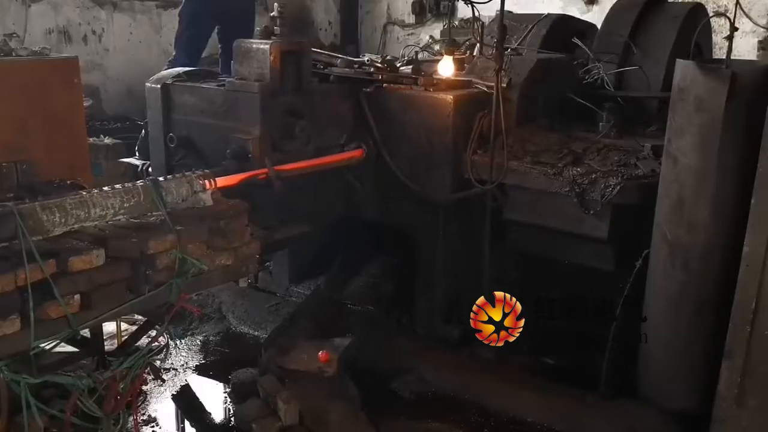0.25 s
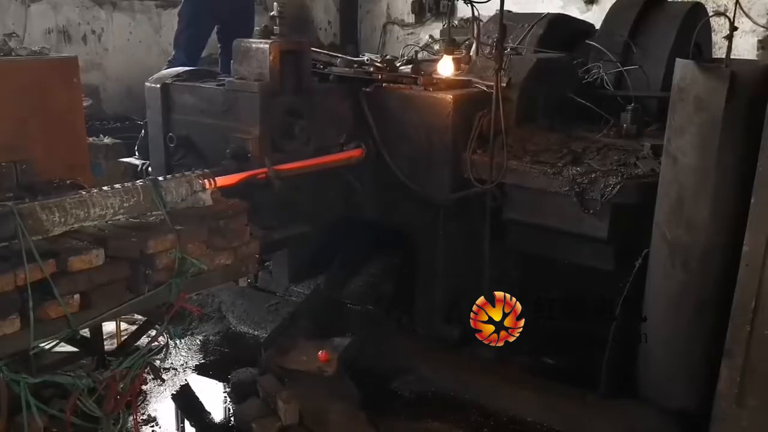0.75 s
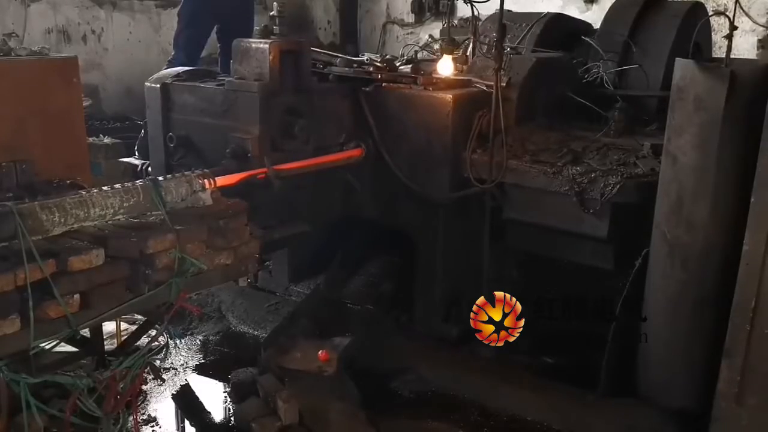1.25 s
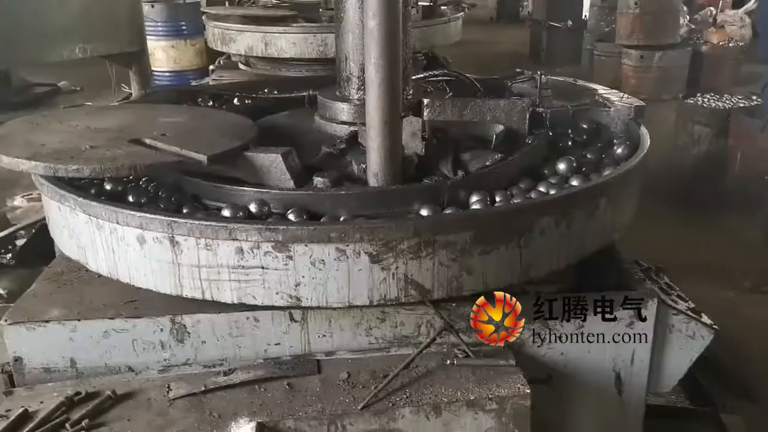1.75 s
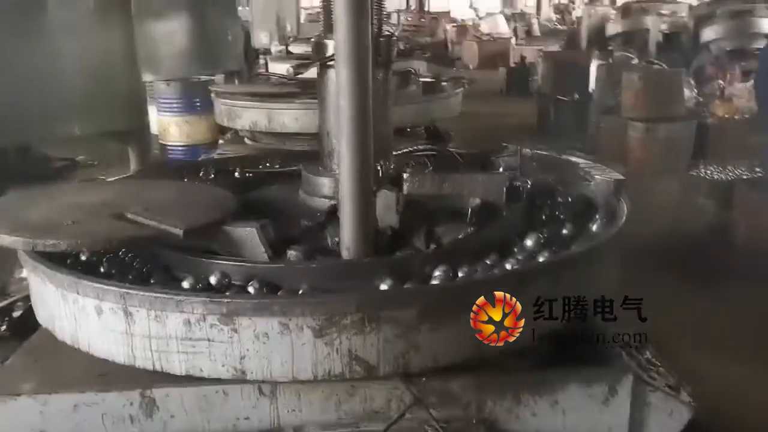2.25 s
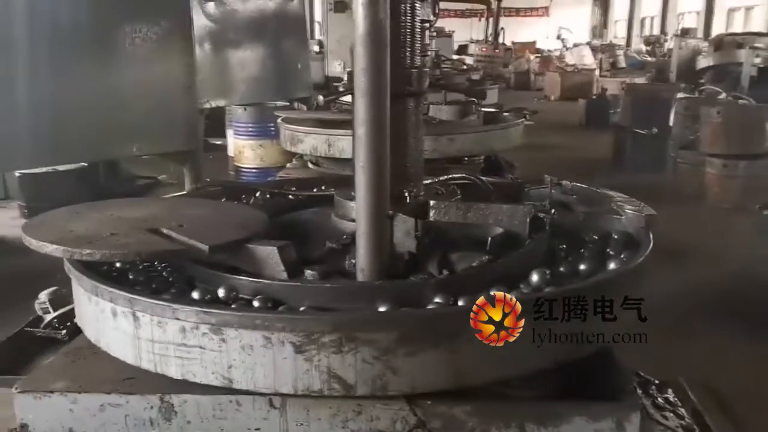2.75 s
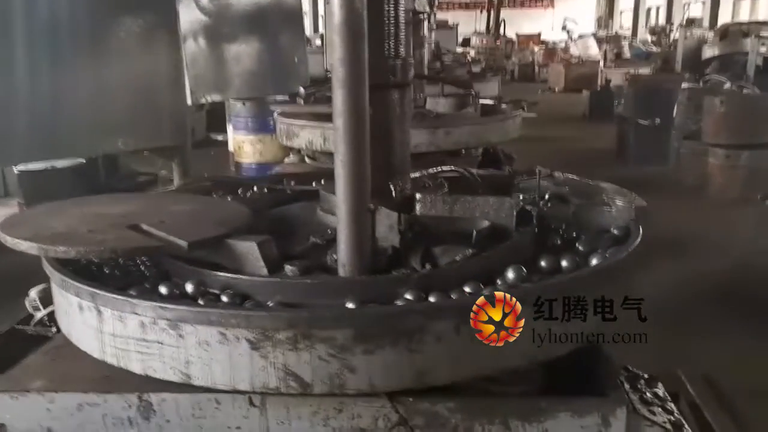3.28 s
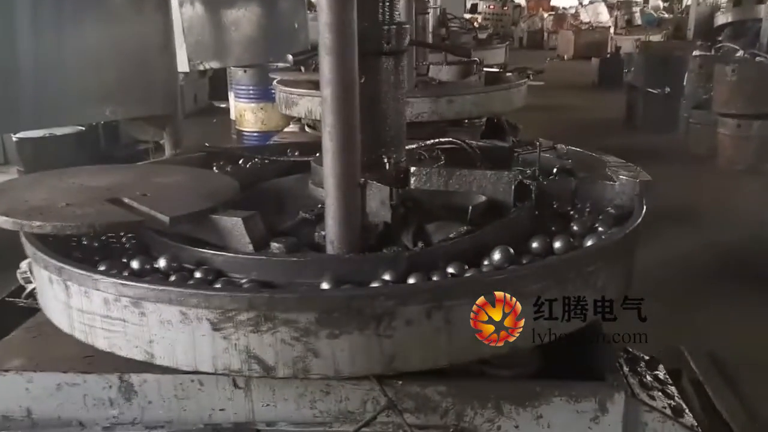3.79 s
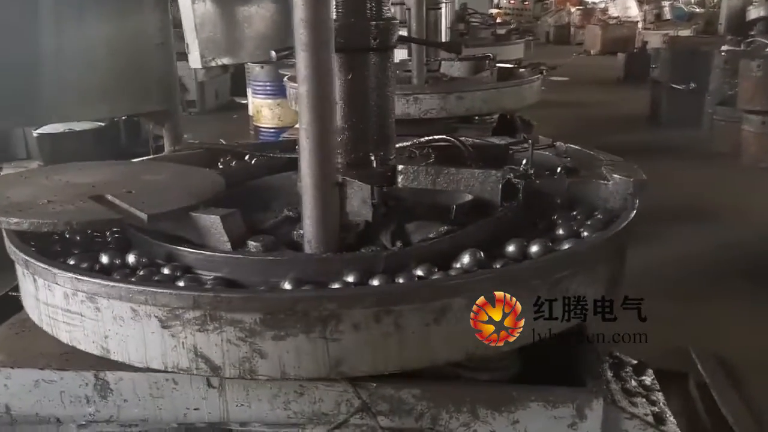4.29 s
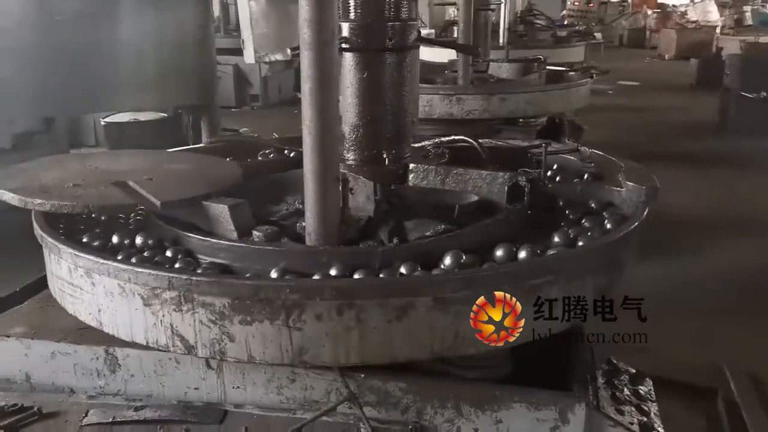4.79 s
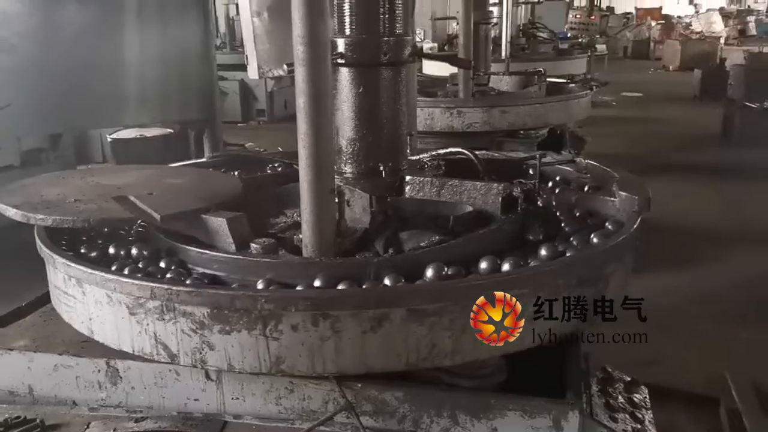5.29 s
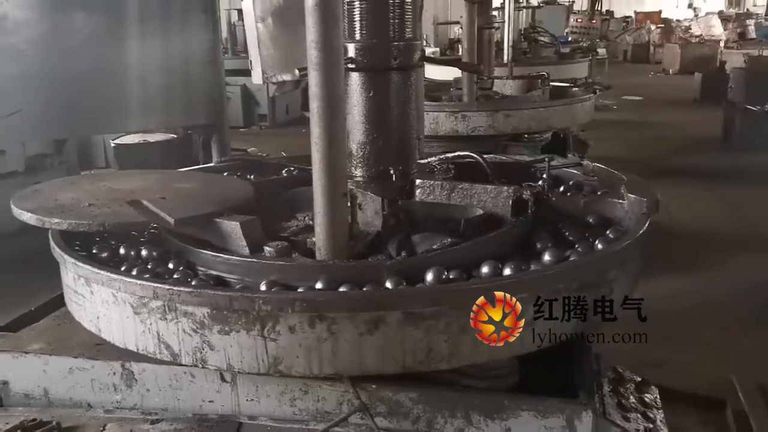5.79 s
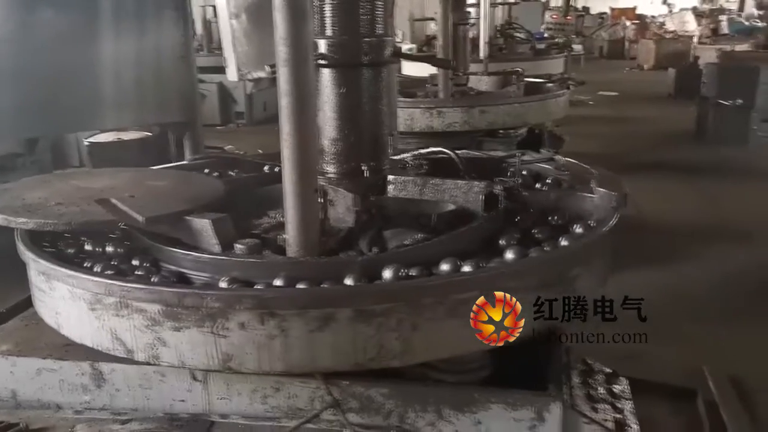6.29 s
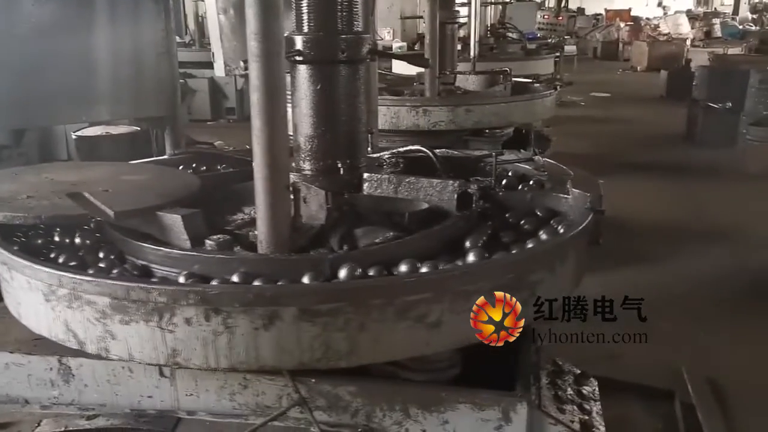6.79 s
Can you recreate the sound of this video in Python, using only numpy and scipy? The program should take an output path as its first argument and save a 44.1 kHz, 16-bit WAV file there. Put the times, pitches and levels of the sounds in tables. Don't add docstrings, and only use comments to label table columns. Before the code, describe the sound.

In a factory hall, a rolling mill rumbles and clatters, its plate and steel bars ringing over low metallic groans and bright clanks. It cuts to a short silence. Then a ball grinder bursts in louder, with dense rolling steel balls, dull thuds, hard iron knocks and glassy clinks continuing to the end. Stereo microphones, fairly close, with some hall reverberation.

```python
import sys
import numpy as np
from scipy import signal
from scipy.fft import rfft, irfft, next_fast_len
from scipy.io import wavfile
from scipy.ndimage import uniform_filter1d

SR = 44100
rng = np.random.default_rng(int(sys.argv[2]) if len(sys.argv) > 2 else 0)


def ratio_of_db(decibels):
    return 10 ** (np.asarray(decibels, float) / 20)


def dump(signal):
    limited = np.clip(np.atleast_2d(signal).T, -1, 1)
    pcm = np.round(limited * 32767).astype(np.int16)
    wavfile.write(sys.argv[1], SR, pcm)


N = 310464
GRINDER_START_S = 2.2055
SIZE = next_fast_len(N + SR)
HZ = np.arange(SIZE // 2 + 1) * SR / SIZE + 1e-3


def on_hz(table):
    hz, value = np.transpose(table)
    return np.interp(np.log(HZ), np.log(hz), value)


def body(colour, peaks):
    lift_db = sum(db * resonance(hz, width_hz) for hz, width_hz, db in peaks)
    return ratio_of_db(on_hz(colour) + lift_db)


def resonance(hz, width_hz):
    return 1 / (1 + (2 * (HZ - hz) / width_hz) ** 2)


def band(lo_hz, hi_hz):
    return (1 + (lo_hz / HZ) ** 6) ** -.5 * (1 + (HZ / hi_hz) ** 6) ** -.5


# frequency in Hz, level in dB per Hz.
TREBLE_COLOUR = [(1000, 5), (3500, 5), (4500, -0.5), (6000, -2.5), (6700, -4), (7600, 3), (8200, -1),
                 (9300, -10), (10000, -22.5), (11500, -27), (12500, -31.5), (14500, -36), (15300, -49)]


def treble():
    return ratio_of_db(on_hz(TREBLE_COLOUR))


def ports(front, around, like, lean, lag):
    likeness = np.clip(on_hz(like), 0, 1)
    shared = np.sqrt(1 + likeness) * front
    apart = np.sqrt(1 - likeness) * around
    tilt = ratio_of_db(on_hz(lean) / 2)
    delay = np.exp(-2j * np.pi * HZ * lag / SR)
    return np.array([(shared + apart) * tilt * delay, (shared - apart) / tilt])


def tails(t60_s, hall_t60_s, hall_db):
    t = np.arange(SR // 2) / SR
    metal = ratio_of_db(-60 * t / t60_s)
    hall = ratio_of_db(hall_db - 60 * t / hall_t60_s) * (1 - np.exp(-t / 0.028))
    return rfft((metal + hall) * rng.standard_normal((2, len(t))), SIZE)


def impacts(rate, scatter_db, t60_s, hall_db, count=5):
    out = 0
    for _ in range(count):
        when = rng.random(N)
        size = np.minimum(rng.exponential(size=N), 3)
        hits = (when < rate / count / SR) * ratio_of_db(scatter_db * size)
        out = out + rfft(hits - hits.mean(), SIZE) * tails(t60_s, 0.78, hall_db)
    return out


def played(pair, gain, ear, db):
    x = irfft(ports(*pair, *ear) * gain, SIZE)[:, :N]
    rms = np.sqrt(np.mean(x.mean(axis=0) ** 2))
    return x / rms * ratio_of_db(uniform_filter1d(db, size=SR // 20))


def follow(effort_db, mean_db, slope):
    return mean_db + slope * effort_db


def controls(table):
    s, *columns = np.transpose(table)
    return [np.interp(np.arange(N) / SR, s, c) for c in columns]


def blows(table, gain, second, ear, share, t60_s, growth, trim_db, rise_s, width, snap_db):
    dry, t = np.zeros((2, 2, SIZE)), np.arange(SR // 4) / SR
    for s, db, hz, second_db in table:
        crack = rng.standard_normal((2, len(t)))
        edges = [hz * (1 - width), hz * (1 + width)]
        sos = signal.butter(1, edges, "bandpass", fs=SR, output="sos")
        ring = signal.sosfilt(sos, crack)
        dying_s = max(t60_s * np.exp(growth * (db + 27.5)), .02)
        linger = ratio_of_db(60 * t / dying_s * (1 - 1 / 1.15))
        burst = np.sqrt(1 - share) * crack + np.sqrt(share) * ring / ring.std() * linger
        fade = (1 - np.exp(-t / rise_s)) * ratio_of_db(db + trim_db - 60 * t / dying_s)
        fade = fade * (1 + ratio_of_db(snap_db) * np.exp(-t / 0.0033))
        i = int(s * SR)
        dry[..., i:i + len(t)] += np.array([burst, crack * ratio_of_db(second_db)]) * fade
    colours = [g / np.sqrt(np.mean(g ** 2)) for g in (gain, second)]
    return irfft(sum(ports(*rfft(d), *ear) * g for d, g in zip(dry, colours)), SIZE)[:, :N]


# frequency in Hz, level in dB per Hz.
MILL_COLOUR = [(35, -39.5), (60, -26.5), (141, -2), (189, -7), (264, -6), (451, -8.5), (730, -10),
               (1740, -12.5), (2870, -14.5), (4230, -32), (5000, -19), (6500, -24), (11000, -120)]
# frequency in Hz, width in Hz, lift in dB.
FRAME_MODES = [(156, 55, 2), (255, 38, 2.5), (370, 34, 0), (787, 270, 1), (2810, 800, -5.5)]


def mill_body():
    return body(MILL_COLOUR, FRAME_MODES)


# frequency in Hz, likeness from -1 to 1.
MILL_LIKE = [(60, 0.37), (130, 1), (290, 0.9), (630, 0.71), (1390, 0.015), (3040, 0.24), (6680, -0.63),
             (14600, 0.18)]
# frequency in Hz, left minus right in dB.
MILL_LEAN = [(60, 2.5), (110, 4), (200, 3.5), (370, 3.5), (690, 2.5), (1270, 4.5), (2340, 0.5), (4320, 4),
             (7950, 2.5), (14600, -6)]


def mill_ear():
    return MILL_LIKE, MILL_LEAN, 0


def frame_rumble(load_db):
    pair = impacts(400, 1.6, 0.072, -1.5)
    return played(pair, mill_body() * band(150, 425), mill_ear(), follow(load_db, -33.5, 0.59))


def roll_clatter(load_db):
    pair = impacts(900, 2.8, 0.13, -6.0)
    return played(pair, mill_body() * band(460, 1800), mill_ear(), follow(load_db, -34, 0.263))


def plate_buzz(shake_db):
    crash_db = 16 * np.exp(-np.arange(N) / SR / .09)
    pair = impacts(700, 1.5, 0.013, -7.5)
    level_db = follow(shake_db, -39, 0.24) + crash_db
    return played(pair, mill_body() * band(2760, 3900), mill_ear(), level_db)


def scale_rattle(shake_db):
    gain = treble() * band(2820, 18000) * (1 + 0.53 * band(6400, 14000))
    pair = impacts(1400, 2.0, 0.039, -14.5)
    return played(pair, gain, mill_ear(), follow(shake_db, -43.5, 0.76))


# frequency in Hz, level in dB per Hz.
DRONE_COLOUR = [(15, -42), (25, -15.5), (59, -6), (102, -2), (130, 2), (170, -21), (290, -120)]


def drone(db):
    pair = rfft(rng.standard_normal((2, N)), SIZE)
    return played(pair, ratio_of_db(on_hz(DRONE_COLOUR)) * band(12, 95), (GRINDER_LIKE, GRINDER_LEAN, 0), db)


# start in seconds, peak in dB, ringing pitch in Hz, dull thud in dB.
PLATE_HITS = [
    (.0034, -29.5, 2800, -16.5),
    (.0894, -37, 2820, -18),
    (.2687, -24, 2770, -13),
    (.3287, -26.5, 2850, -11.5),
    (.9232, -27.5, 2880, -7),
    (1.2386, -32, 3700, -1),
    (1.737, -31, 3150, -7.5),
]


def plate_hits():
    return blows(PLATE_HITS, band(1700, 4500), mill_body() * band(400, 2000), mill_ear(),
                 share=0.95, t60_s=0.43, growth=.005, trim_db=-19.0, rise_s=0.0018, width=.024, snap_db=2.0)


# start in seconds, peak in dB, ringing pitch in Hz, dull thud in dB.
CLANKS = [(.1674, -29.5, 8300, -15), (.2545, -24, 5730, -12), (.2684, -26, 8400, -2),
          (.3287, -28.5, 5900, -15), (.4047, -24, 6660, -2), (.557, -32, 5280, -11),
          (.6365, -26, 8740, 2.5), (.673, -27, 5500, -17), (.9244, -37, 4750, 14), (.9894, -29, 8050, -30),
          (1.0972, -30, 7560, 7.5), (1.2317, -23.5, 8100, 0.5), (1.288, -30, 7740, -1.5),
          (1.3558, -33.5, 5700, 3), (1.3858, -32, 8100, 8.5), (1.42, -26.5, 6740, -0.5),
          (1.4694, -27.5, 5130, -9), (1.5027, -26, 5700, -10.5), (1.5514, -30, 7000, -5.5),
          (1.6891, -35.5, 8200, -7), (1.7394, -29.5, 4930, 7.5), (1.7714, -27.5, 7600, -2.5),
          (1.8113, -29.5, 8000, -5)]


def clanks():
    bright = treble() * band(3900, 20000) * (HZ / 6000) ** 1.3
    return blows(CLANKS, bright, mill_body() * band(710, 6800), mill_ear(),
                 share=0.049, t60_s=0.22, growth=.02, trim_db=-10, rise_s=0.00033, width=0.046, snap_db=2.7)


# start in seconds, peak in dB, ringing pitch in Hz, dull part in dB.
BARS = [(0.2545, -22, 2830, -14.5), (0.3805, -31, 2870, -16), (0.406, -28, 5130, -11),
        (0.597, -22, 3030, -14.5), (0.6285, -23, 2650, -13.5), (0.823, -25, 2920, -15),
        (0.876, -22, 2750, -11), (0.923, -20.5, 3140, -15), (0.9622, -33, 2800, -13),
        (1.047, -25, 2380, -11), (1.0979, -27, 2460, -11.5), (1.1917, -26.5, 3490, -15),
        (1.2311, -23.5, 3700, -16.5), (1.289, -27, 3000, -14), (1.3578, -26, 3620, -14.5),
        (1.4666, -22, 5170, -13), (1.5015, -25.5, 5900, -13), (1.6686, -29.5, 2610, -14.5),
        (1.7025, -24.5, 2800, -14.5), (1.7382, -22.5, 2400, -12), (1.7716, -25, 2450, -12),
        (1.8147, -29.5, 3030, -15.5)]


def bars():
    return blows(BARS, band(2400, 8800), mill_body() * band(700, 3000), mill_ear(),
                 share=.85, t60_s=0.11, growth=.01, trim_db=-17, rise_s=0.00091, width=0.011, snap_db=-5.5)


# start in seconds, peak in dB, pitch in Hz, dull part in dB.
MOANS = [(.575, -24.5, 262, -12), (.61, -26, 138, -12), (.625, -22, 282, -12), (.7, -24.5, 225, -12),
         (.69, -18, 140, -14), (.735, -21, 378, -14), (.77, -29, 135, -12), (.775, -20.5, 252, -12),
         (.87, -27, 280, -10), (.905, -21.5, 146, -9.5), (1.39, -23, 740, -12), (1.46, -26.5, 720, -10),
         (1.54, -24, 790, -10), (1.61, -20, 262, -11), (1.67, -26, 255, -10.5), (1.73, -32.5, 1330, -11)]


def moans():
    return blows(MOANS, band(100, 2200), mill_body() * band(100, 900), mill_ear(),
                 share=0.94, t60_s=.4, growth=.005, trim_db=-19.5, rise_s=0.0094, width=0.023, snap_db=-21)


# centre in seconds, level in dB, half length in seconds.
GROANS = [
    (0.765, -38.5, 0.21),
    (1.549, -41.5, 0.13),
]


def groan():
    t = np.arange(N) / SR
    bites = sum(ratio_of_db(2 * db) * np.exp(-((t - s) / half_s) ** 2) for s, db, half_s in GROANS)
    stand = resonance(150, 110) + ratio_of_db(-6) * resonance(263, 91)
    return played(impacts(300, 1.3, 0.14, 5.0), stand, mill_ear(), 10 * np.log10(1e-9 + bites))


# time in seconds, load on the frame in dB, shaking of loose scale in dB.
MILL_EFFORT = [(0, 17, 14.5), (.13, -5, 6.5), (.22, -5, -9), (.26, 1, 15), (.32, -18, 1), (.5, -1, 1.5),
               (.66, 3.5, 9), (.86, 1, 0.5), (1.04, -1.5, 1), (1.11, -0.5, 6.5), (1.21, -1, 1.5),
               (1.25, -6, 6.5), (1.35, -1.5, -4.5), (1.42, 2.5, 8), (1.53, 0, 1.5), (1.64, 5.5, 3.5),
               (1.82, -3, -2)]


def mill():
    load_db, shake_db = controls(MILL_EFFORT)
    running = frame_rumble(load_db) + roll_clatter(load_db) + drone(follow(load_db, -45, 0.56))
    shaken = plate_buzz(shake_db) + scale_rattle(shake_db)
    return running + shaken + plate_hits() + clanks() + bars() + moans() + groan()


# frequency in Hz, level in dB per Hz.
GRINDER_COLOUR = [(35, -42), (60, -4.5), (169, -1), (249, 4), (329, 1.5), (404, 3.5), (584, -3),
                  (963, -4.5), (1250, -4.5), (2260, -4.5), (5000, -10.5), (6500, -6.5), (11000, -120)]
# frequency in Hz, width in Hz, lift in dB.
TRAY_MODES = [(436, 1030, 8.1), (964, 370, 6.5), (1800, 33, 0.67), (2120, 510, 1), (2796, 110, 5.4),
              (3730, 130, 0.63), (4200, 18, 10)]


def tray_body():
    return body(GRINDER_COLOUR, TRAY_MODES)


# frequency in Hz, likeness from -1 to 1.
GRINDER_LIKE = [(60, 0.96), (130, 0.94), (290, 0.93), (630, 0.79), (1390, 0.4), (3040, 0.089),
                (6680, 0.074), (14600, -0.78)]
# frequency in Hz, left minus right in dB.
GRINDER_LEAN = [(60, 3), (110, -2), (200, -1), (370, 0.5), (690, 0), (1270, 3.5), (2340, 0), (4320, 1),
                (7950, -3), (14600, -9.5)]


def grinder_ear():
    return GRINDER_LIKE, GRINDER_LEAN, 3.4


def drive_rumble(churn_db):
    pair = impacts(500, 2.0, 0.21, -1.7)
    return played(pair, tray_body() * band(85, 760), grinder_ear(), follow(churn_db, -34, 0.68))


def bowl_hum(sway_db):
    pair = impacts(150, 2.2, 0.22, -1.5)
    return played(pair, resonance(451, 220), grinder_ear(), follow(sway_db, -42.5, 1))


def tray_boom(sway_db):
    pair = impacts(800, 1.5, 0.11, -5.0)
    return played(pair, tray_body() * band(640, 1940), grinder_ear(), follow(sway_db, -35.5, 0.81))


def ball_churn(churn_db):
    pair = impacts(600, 2.48, 0.098, -14)
    return played(pair, tray_body() * band(1353, 4220), grinder_ear(), follow(churn_db, -32, 0.87))


def wall_ring(churn_db):
    modes = resonance(2204, 260) + ratio_of_db(-3) * resonance(3030, 150) + ratio_of_db(-8.5) * resonance(3470, 520)
    return played(impacts(200, 2.7, 0.06, -9.5), modes, grinder_ear(), follow(churn_db, -41, 2.2))


def ball_ticks(churn_db, surge_db):
    pair = impacts(500, 4.3, 0.029, -14.0, count=8)
    level_db = follow(churn_db, -38.5, 0.81) + surge_db
    return played(pair, treble() * band(3820, 16000), grinder_ear(), level_db)


# start in seconds, peak in dB, ringing pitch in Hz, brighter part in dB.
THUDS = [(2.204, -15, 624, -9), (2.223, -18, 1070, -13.5), (2.281, -25, 507, -10), (2.364, -20, 982, -10),
         (2.396, -27.5, 544, -10), (3.132, -34, 904, -10), (3.199, -23, 930, -10), (3.285, -17.5, 996, -10),
         (3.398, -23, 420, -10), (3.442, -17.5, 413, -10), (3.477, -20, 495, -8), (3.513, -17, 410, -10),
         (3.59, -22, 604, -10), (3.658, -24, 496, -10), (3.999, -18.5, 930, -14), (4.076, -18, 393, -10),
         (4.119, -25, 398, -10), (4.139, -16.5, 393, -10), (4.197, -18, 487, -10), (4.393, -28, 382, -10),
         (4.454, -24, 417, -10), (4.611, -19, 503, -10), (4.649, -16, 476, -10), (4.711, -25.5, 497, -10),
         (4.779, -22, 425, -10), (4.847, -16, 423, -10), (4.962, -15.5, 410, -10), (5.196, -23, 417, -10),
         (5.233, -17, 1060, -10), (5.259, -27, 504, -10), (5.337, -18, 800, -10), (5.41, -20.5, 970, -10),
         (5.579, -20, 960, -10), (5.717, -18, 526, -8), (5.76, -20, 1000, -10), (5.82, -20, 404, -10),
         (5.848, -35, 970, -12), (5.974, -16.5, 500, -5), (6.26, -24, 980, -10), (6.333, -17, 970, -10),
         (6.404, -22, 483, -10), (6.441, -21.5, 1130, -10), (6.539, -16, 382, -10), (6.605, -22, 990, -10),
         (6.666, -16, 483, -10), (6.862, -27.5, 504, -10), (6.933, -29.5, 1030, -10),
         (7.003, -25, 522, -10)]


def thuds():
    return blows(THUDS, band(270, 1830), tray_body() * band(800, 3000), grinder_ear(),
                 share=0.51, t60_s=0.14, growth=0.0063, trim_db=-22.5, rise_s=0.0024, width=0.042, snap_db=0)


# start in seconds, peak in dB, bright tick in dB.
RIM_KNOCKS = [(2.2058, -14.5, -1.5), (2.2692, -23.5, -2), (2.283, -19, 7.5), (2.5839, -27, 9),
              (3.6201, -19, 1.5), (4.0017, -12.5, -3), (4.58, -18.5, -9), (5.0804, -12.5, -9.5),
              (5.1213, -13.5, -12.5), (5.195, -10.5, -15), (5.2345, -15.5, 1), (5.5532, -20.5, 4),
              (5.6894, -15, -8), (6.0283, -12.5, -2.5), (6.116, -11, -5), (6.2347, -22.5, 1.5),
              (6.3506, -15.5, 2), (6.4644, -23.5, 8.5), (6.5448, -14, -5.5), (6.6257, -14, -5),
              (6.6465, -14, 0.5), (6.6585, -20.5, -4.5), (6.9955, -15, -16.5), (7.031, -6.5, -9.5)]
BED_KNOCKS = [(2.2243, -19, 2), (2.3273, -38, -8.5), (2.369, -24, -15), (2.4266, -18, 3.5),
              (2.4606, -20, 3.5), (2.929, -26, 10), (3.4674, -22, -2), (3.553, -22, 10),
              (3.8541, -30.5, 0.5), (4.1813, -22.5, 4.5), (4.344, -16.5, -3), (4.891, -16, -5),
              (5.329, -31, 4), (5.44, -31.5, -12), (5.7174, -18, 0), (5.817, -22, -9),
              (6.1423, -16.5, -2.5), (6.2078, -20.5, -1), (6.4396, -16, 2), (4.006, -19.5, -6.5),
              (6.031, -17, -6), (6.649, -14, -7.5)]
WALL_KNOCKS = [(3.1173, -19.5, -2.5), (3.2852, -20, 1), (3.4419, -22, -16), (3.5691, -16, -4),
               (3.5962, -18, 5.5), (3.7043, -22.5, 6.5), (3.7787, -23, 5.5), (3.9129, -29, 3),
               (4.0652, -25, 5.5), (4.1197, -37, -5), (4.3086, -13, -27), (4.4108, -21.5, -.5),
               (4.6086, -14.5, -2.5), (4.7171, -17.5, 0.5), (4.774, -12, -2), (4.8069, -20, 9),
               (4.8525, -14.5, -9), (4.922, -22, -13), (4.9608, -20.5, 5), (5.2738, -14, 2),
               (5.3997, -27, -7.5), (5.5899, -14.5, -2), (5.8452, -16.5, -1), (5.9599, -19.5, 3),
               (5.9807, -19, 2.5), (6.2766, -16, -3.5), (6.319, -25.5, 5), (6.516, -29, -11),
               (6.8276, -16, -15.5), (6.871, -33, -10.5)]


def knocks():
    parts = ((BED_KNOCKS, 1760), (WALL_KNOCKS, 2204), (RIM_KNOCKS, 3030))
    struck = [(s, db, hz, tick_db) for table, hz in parts for s, db, tick_db in table]
    iron = tray_body() * band(490, 3750) * (HZ / 2000) ** 0.051
    tick = treble() * band(3200, 18000) * (HZ / 7000) ** 0.34
    return blows(struck, iron, tick, grinder_ear(),
                 share=0.35, t60_s=0.054, growth=0.0073, trim_db=-11.5, rise_s=0.0039, width=0.14, snap_db=-4.5)


# start in seconds, peak in dB, ringing pitch in Hz, dull part in dB.
CLINKS = [(2.285, -28, 7760, -11), (2.3284, -33, 7450, -14), (3.0521, -31.5, 8050, -14),
          (3.2312, -29.5, 7700, -12), (3.468, -25.5, 7240, 9), (3.6011, -22, 8100, -7),
          (3.7019, -22.5, 8200, -10), (3.745, -32.5, 7700, -12), (4.121, -27.5, 7850, -12),
          (4.1986, -28, 7500, -12), (4.341, -27, 7700, -12), (4.4115, -26, 7900, -10),
          (4.445, -25, 7500, -12), (4.4808, -25.5, 7760, -9), (4.7168, -30, 7950, -12),
          (4.7658, -33, 7700, -12), (4.9129, -34.5, 7600, -12), (4.9612, -26, 7800, -12),
          (5.1956, -32, 7570, -1), (5.244, -23.5, 7500, -6), (5.3286, -26.5, 7320, -12),
          (5.4176, -39, 7950, -12), (5.5922, -24.5, 7840, -12), (5.6697, -31, 7630, -12),
          (6.0098, -25.5, 8040, -14), (6.0468, -22, 8560, -16), (6.117, -36.5, 7420, -9),
          (6.4388, -26.5, 7990, -1), (6.646, -26, 7550, -12), (6.778, -34, 7780, -12)]


def clinks():
    return blows(CLINKS, treble() * band(3560, 18000), tray_body() * band(1500, 4100), grinder_ear(),
                 share=0.38, t60_s=0.099, growth=.01, trim_db=-11.5, rise_s=0.00075, width=0.054, snap_db=-11.0)


# time in seconds, churn of the balls in dB, sway of the tray in dB.
GRINDER_EFFORT = [(2.22, 2.5, 8.5), (2.38, -2.5, 2.5), (2.66, -3, -4.5), (3.3, -2.5, -3.5),
                  (3.46, 0.5, 1.5), (3.78, -2.5, -3), (3.94, 0, -1), (4.2, -0.8, 0.5), (4.45, 2, 0),
                  (4.9, 1.1, -3), (5.3, 0.5, -2.5), (5.54, 2, 2), (5.7, -2, -5), (5.86, 1, 1.5),
                  (6.18, -0.5, -7), (6.34, 0.5, -1), (6.5, -0.5, -7), (7.0, 0.5, 1)]


def grinder():
    churn_db, sway_db = controls(GRINDER_EFFORT)
    surge_db = 3.5 * np.exp(-np.abs(np.arange(N) / SR - GRINDER_START_S) / 0.18)
    hum = drone(follow(churn_db - 1.4 * surge_db, -50.5, 1.6))
    tray = drive_rumble(churn_db) + bowl_hum(sway_db - surge_db) + tray_boom(sway_db)
    balls = ball_churn(churn_db) + wall_ring(churn_db) + ball_ticks(churn_db, surge_db)
    return hum + tray + balls + thuds() + knocks() + clinks()


def scene():
    t = np.arange(N) / SR
    mill_end_s = 1.8235
    past_s = np.clip(t - mill_end_s, 0, .1)
    leak_after = ratio_of_db(-40.5 - 14000 * past_s) * (t < mill_end_s + .009)
    leak_before = ratio_of_db(-31.0) * (t > GRINDER_START_S - .019)
    mill_gate = np.where(t < mill_end_s, 1, leak_after)
    grinder_gate = np.where(t > GRINDER_START_S, 1, leak_before)
    return mill() * mill_gate + grinder() * grinder_gate


def roll_off(x):
    return signal.sosfilt(signal.butter(12, 15240, fs=SR, output="sos"), x)


def record(dry):
    return roll_off(dry)


dry = scene()
out = record(dry)
dump(out)
```